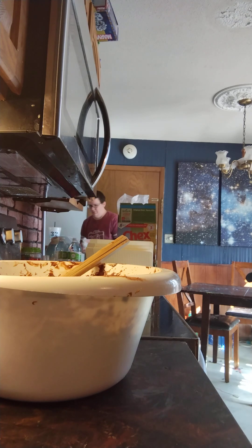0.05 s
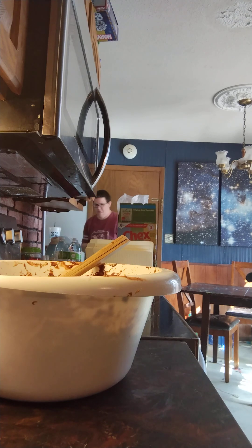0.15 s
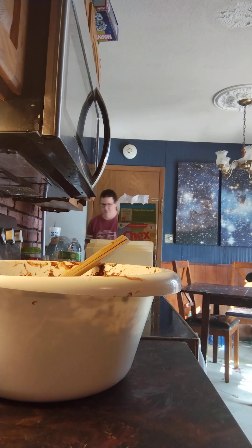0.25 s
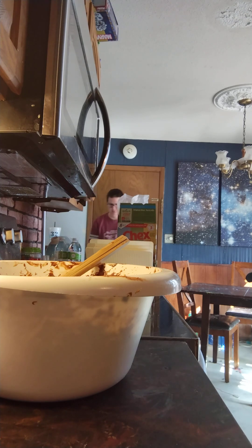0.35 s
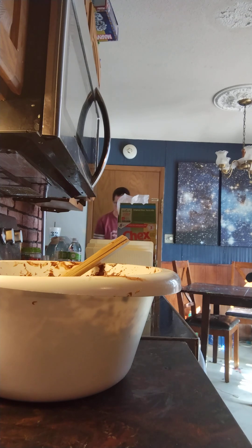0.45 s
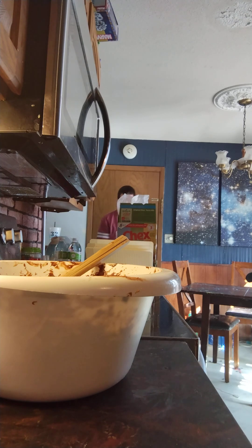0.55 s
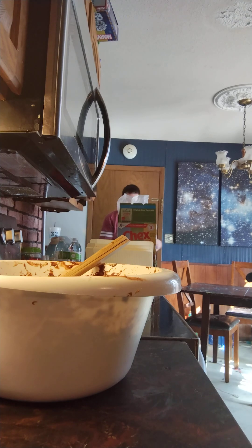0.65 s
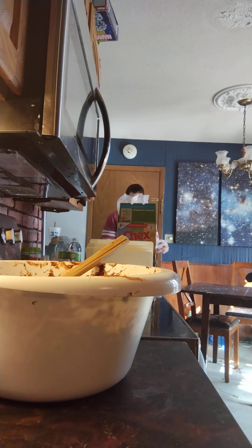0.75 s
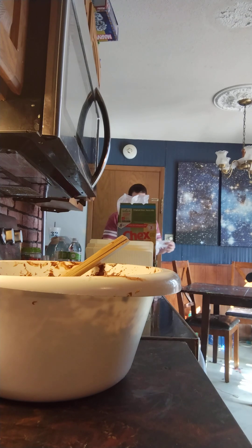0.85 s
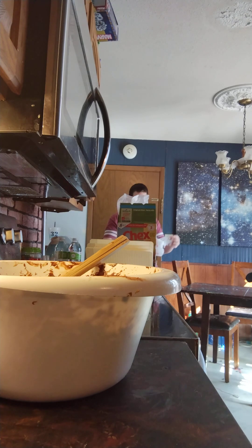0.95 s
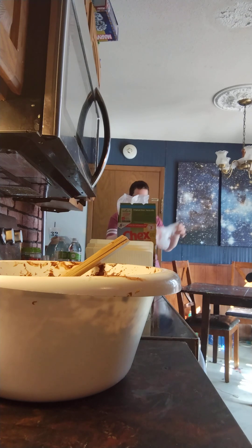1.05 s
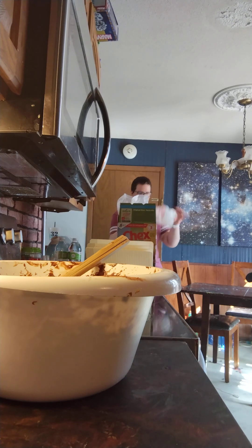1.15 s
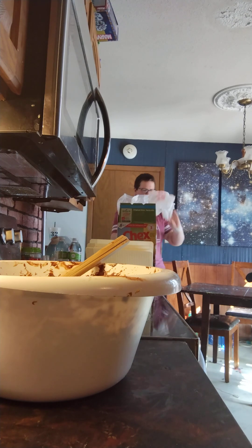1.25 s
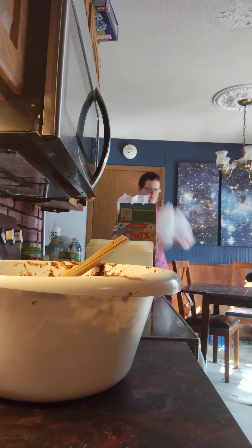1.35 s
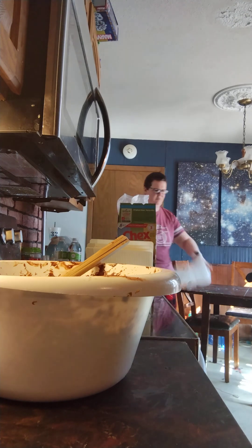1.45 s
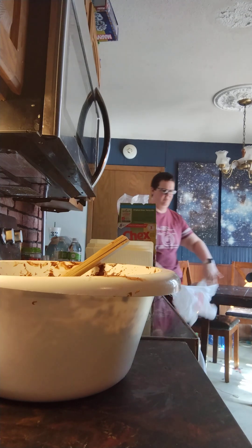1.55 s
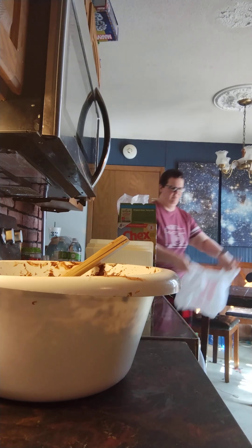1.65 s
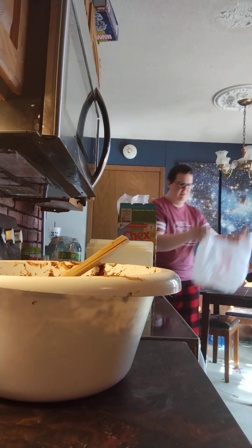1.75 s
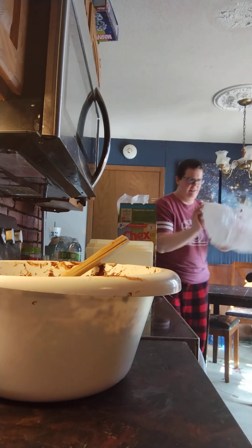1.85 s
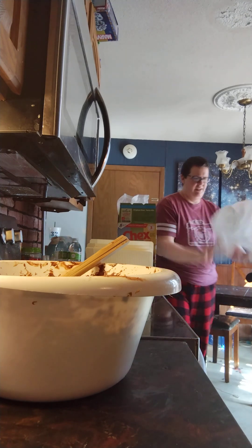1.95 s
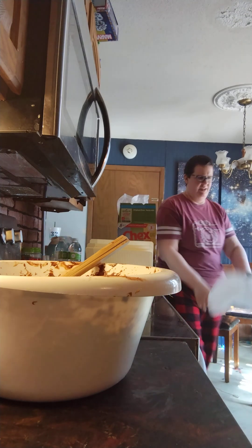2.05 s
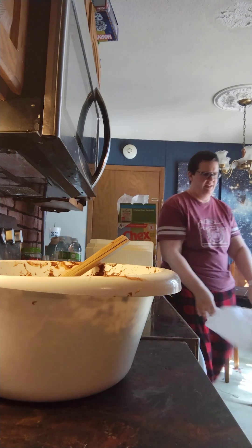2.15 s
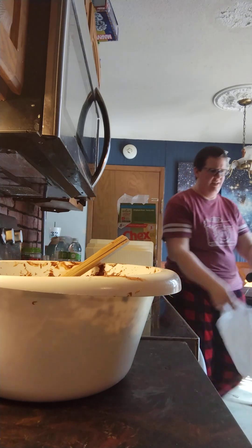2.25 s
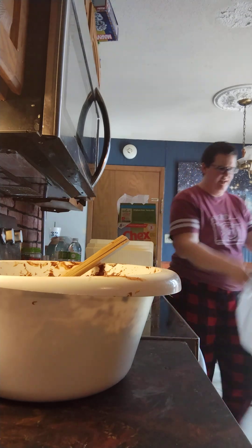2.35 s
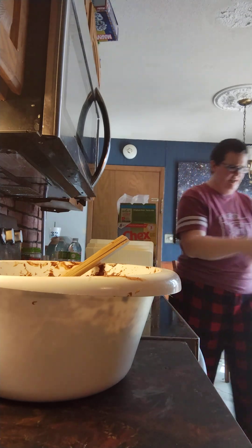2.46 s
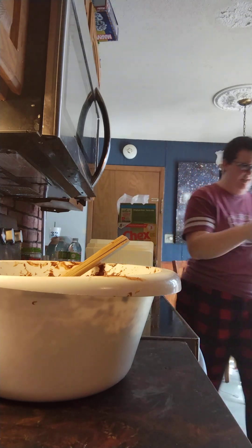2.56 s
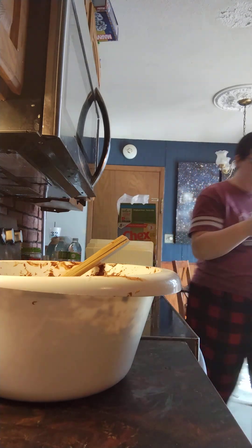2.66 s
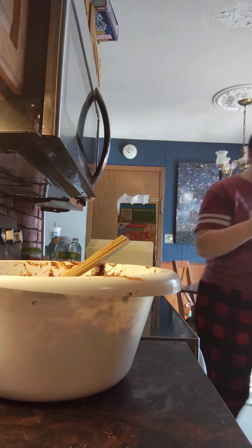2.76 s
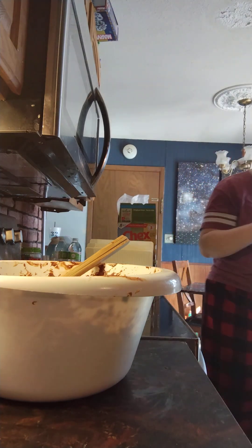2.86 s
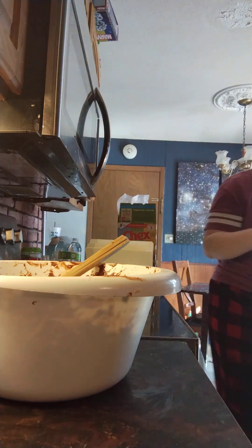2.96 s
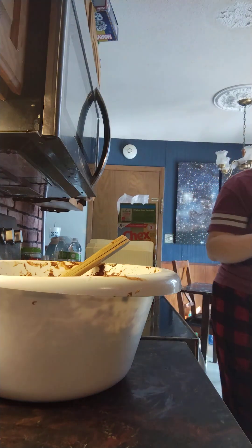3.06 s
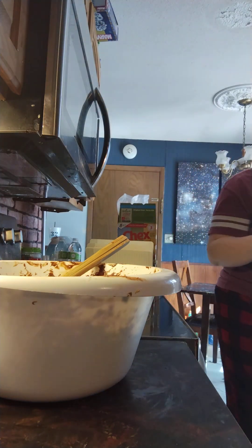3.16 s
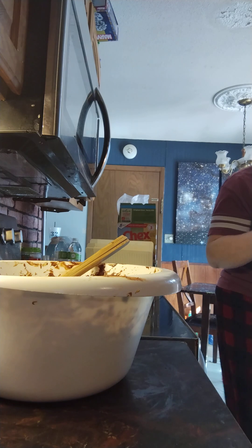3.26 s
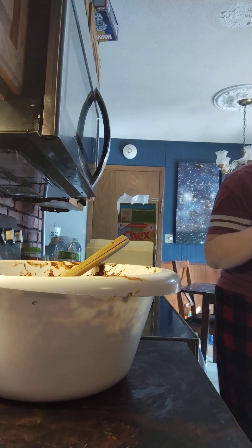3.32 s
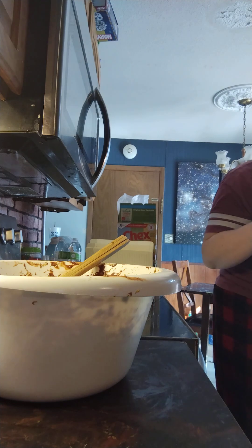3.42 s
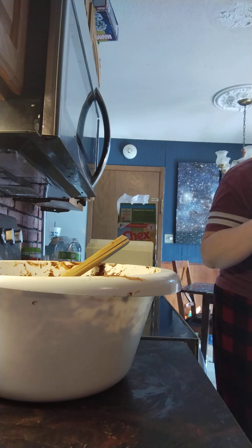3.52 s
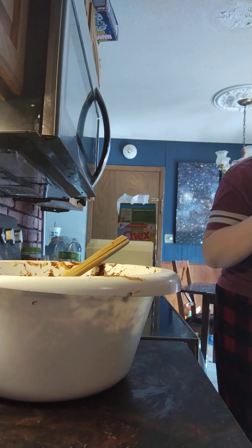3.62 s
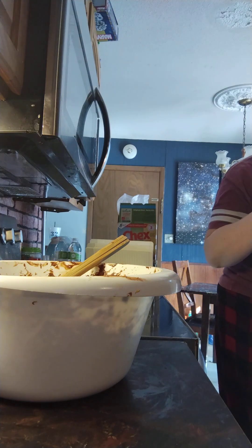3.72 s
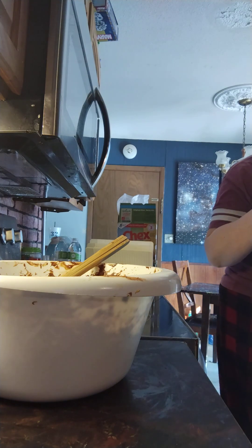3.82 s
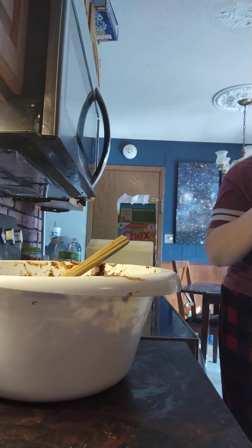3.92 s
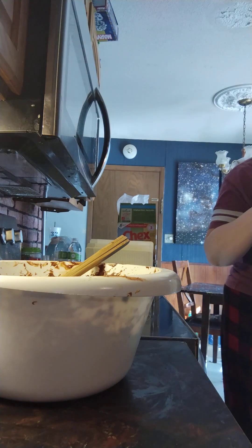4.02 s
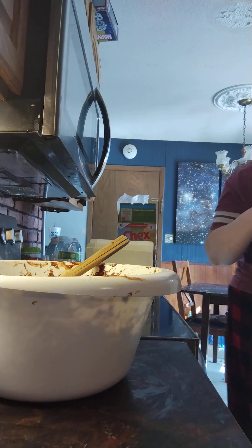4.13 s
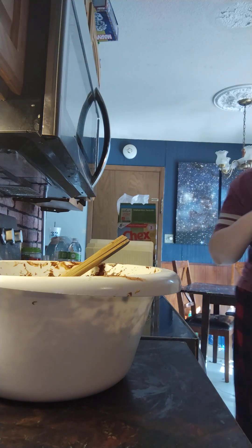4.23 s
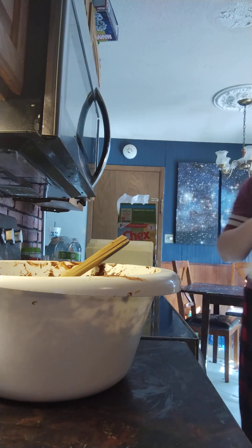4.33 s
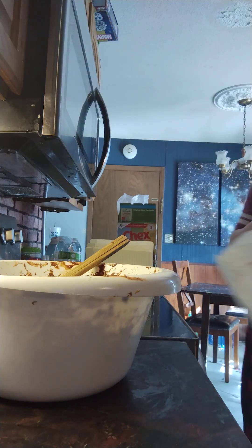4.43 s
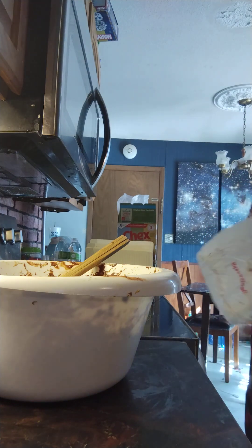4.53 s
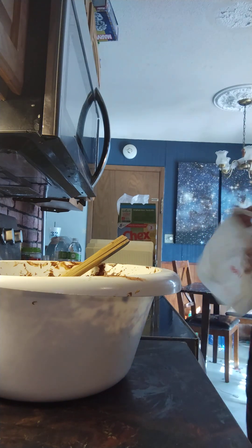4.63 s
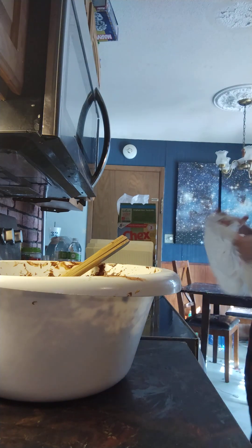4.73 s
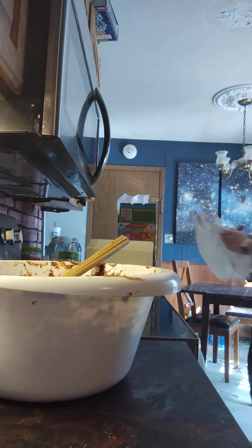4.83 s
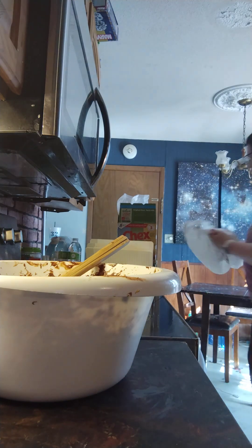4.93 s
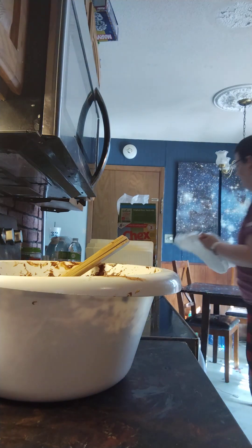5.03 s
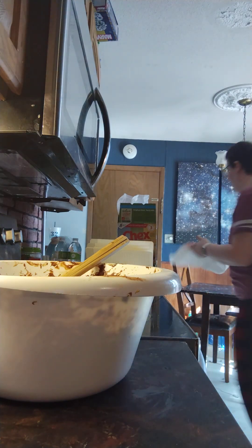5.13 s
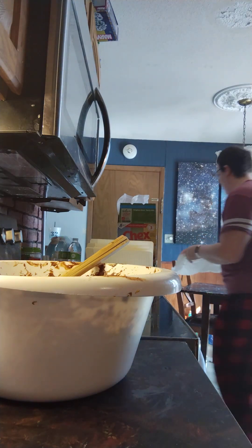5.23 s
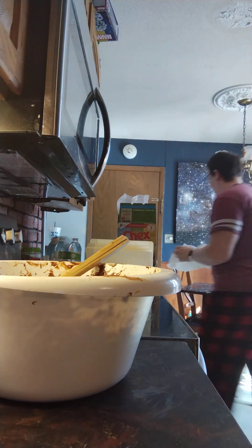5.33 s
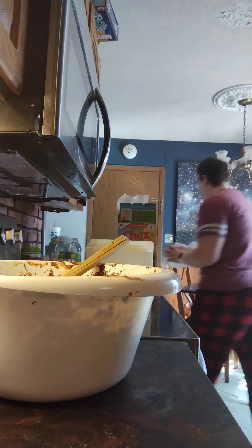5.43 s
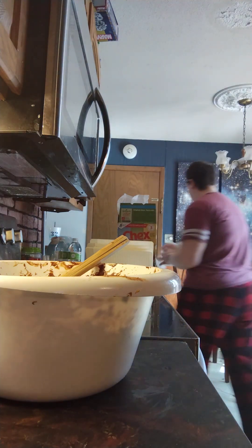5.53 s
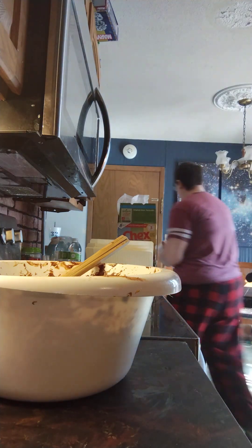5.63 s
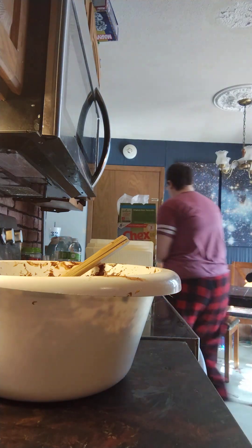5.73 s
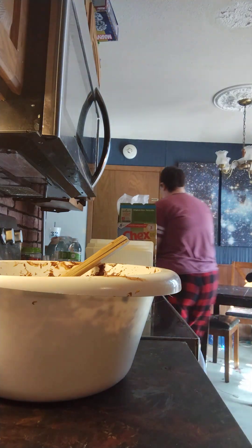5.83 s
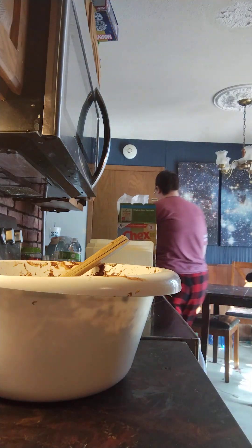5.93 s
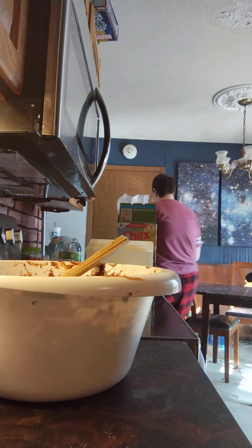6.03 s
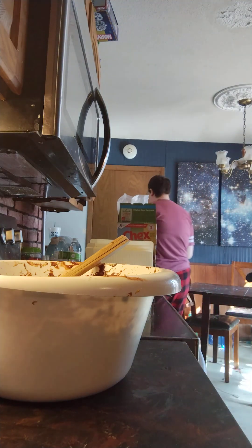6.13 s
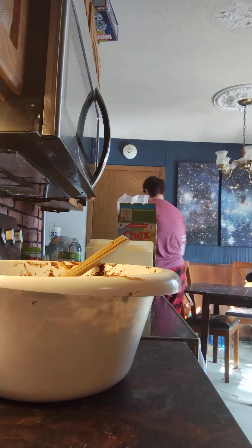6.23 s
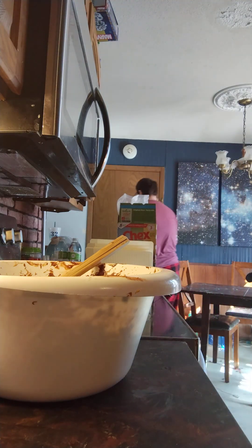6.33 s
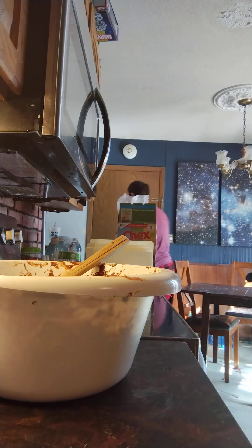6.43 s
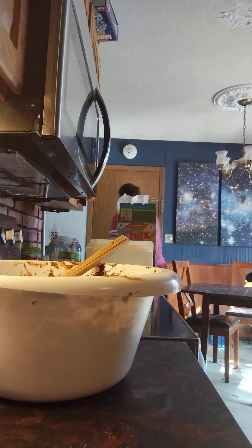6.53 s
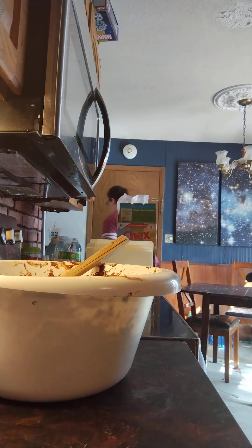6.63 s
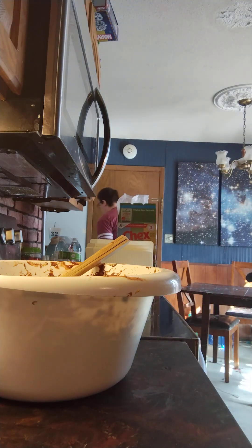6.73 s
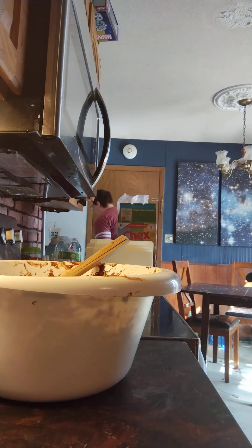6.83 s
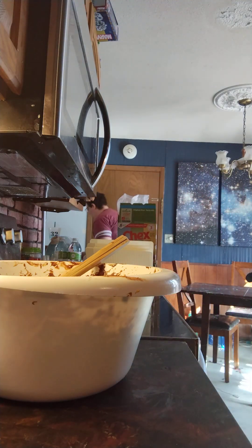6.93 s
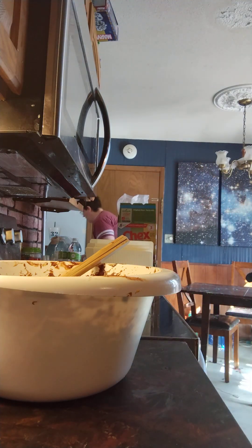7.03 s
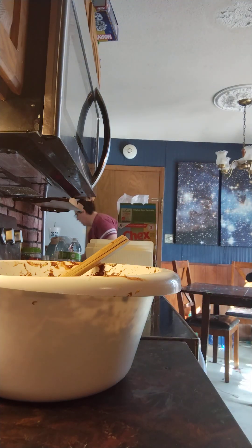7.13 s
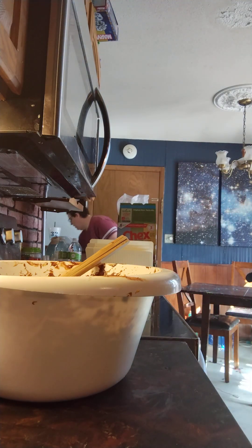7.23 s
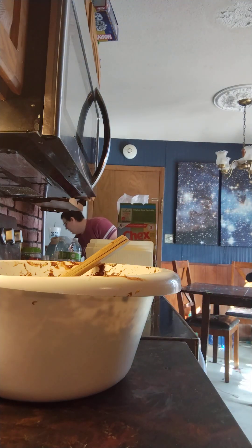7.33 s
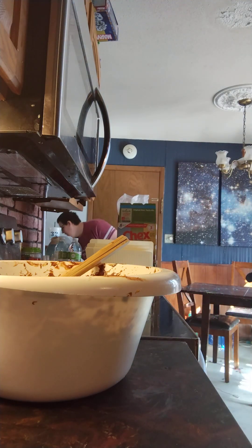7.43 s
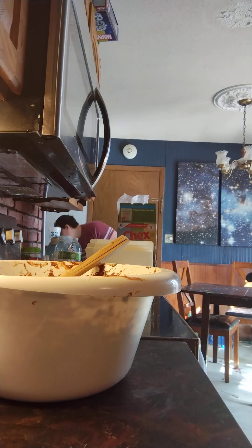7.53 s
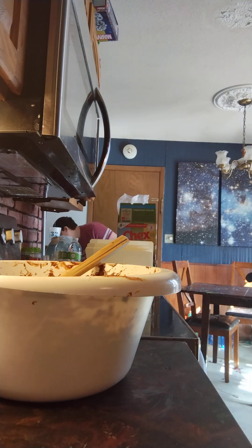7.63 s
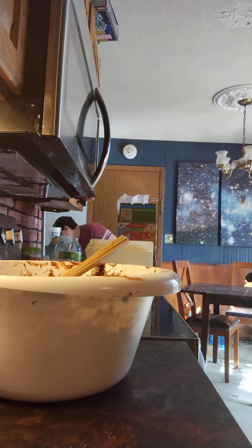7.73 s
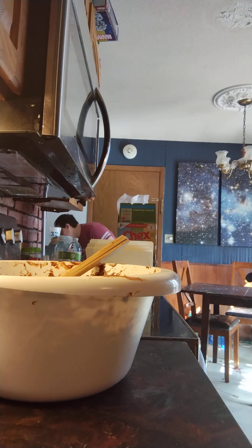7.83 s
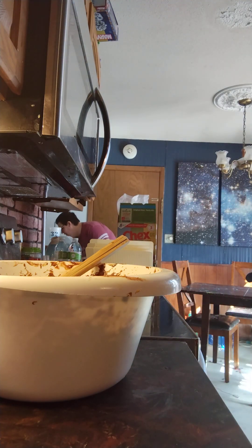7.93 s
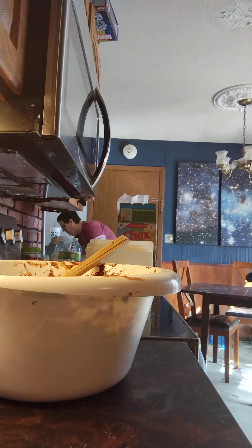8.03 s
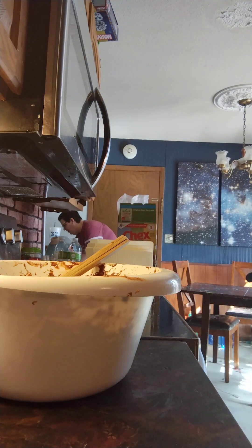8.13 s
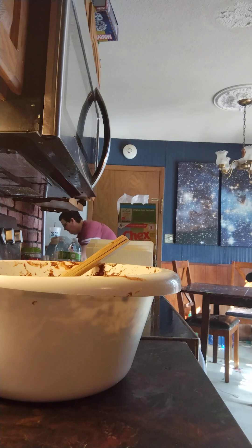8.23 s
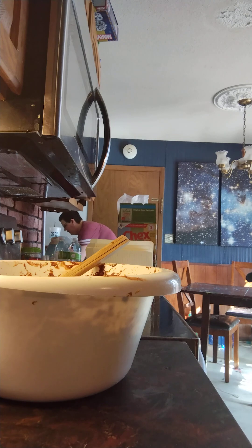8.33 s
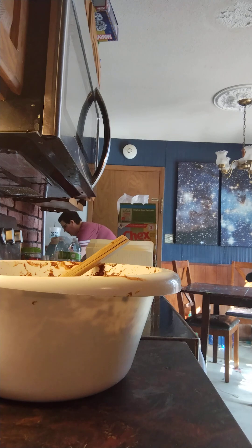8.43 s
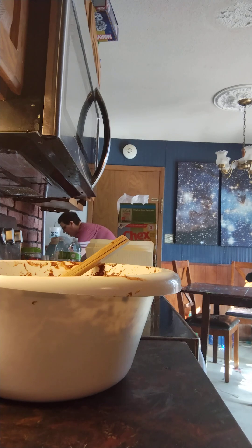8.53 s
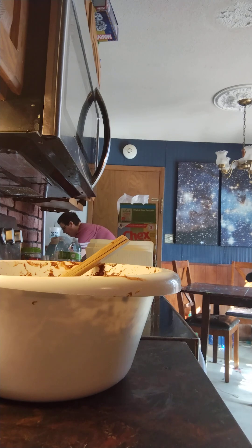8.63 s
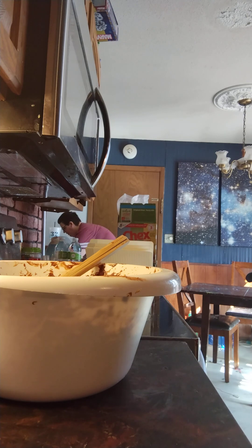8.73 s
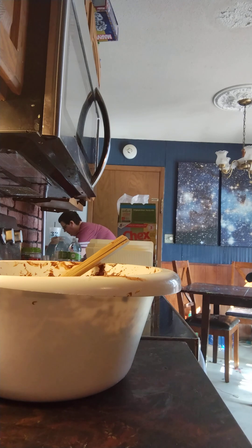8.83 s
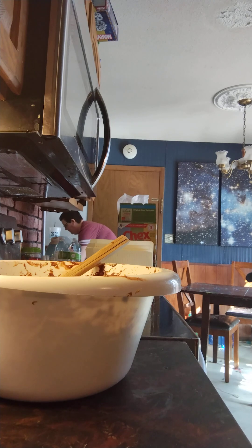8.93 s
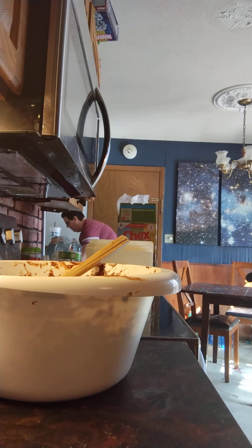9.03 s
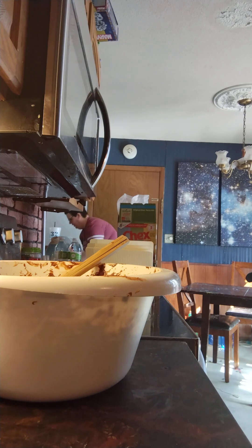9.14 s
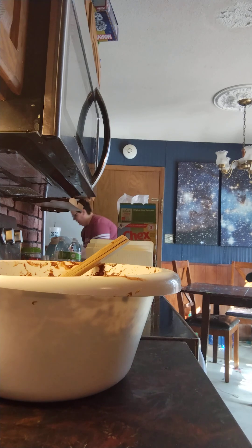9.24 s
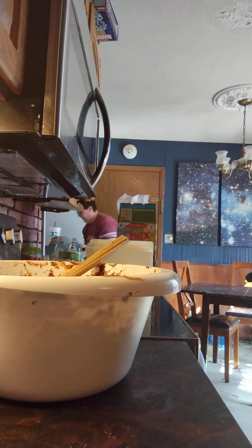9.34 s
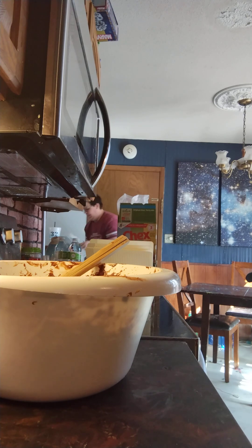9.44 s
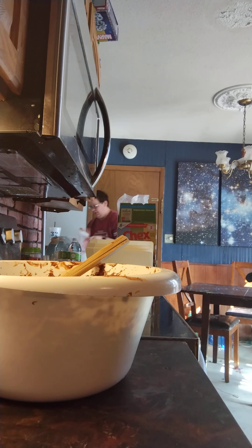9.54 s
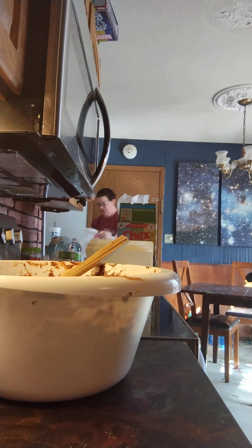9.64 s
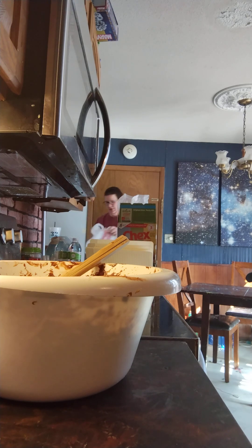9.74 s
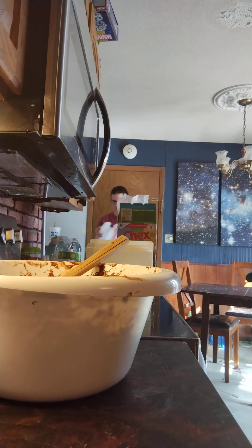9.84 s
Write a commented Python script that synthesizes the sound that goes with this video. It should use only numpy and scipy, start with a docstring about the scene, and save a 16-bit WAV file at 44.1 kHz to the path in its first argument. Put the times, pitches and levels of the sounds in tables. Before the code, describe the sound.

In a quiet, lightly echoing kitchen, a thin plastic bag rustles at the far end, builds, and is shaken with a small crack, then one loud snap at about two seconds. Soft footsteps and dull bumps approach. The bag crackles brightly near the counter microphone, moves away, a cupboard door knocks and rattles, and faint rummaging continues at a distance.

```python
"""Kitchen, heard by a two-port microphone on a counter under wall cupboards.
A thin plastic bag is carried through, shaken open with one loud snap and rummaged with at the far end.
Film: random clicks, filtered in bands and spread over changing room echoes. Snaps: bursts of denser clicks.
Footfalls and bumps: shaped noise. A light tap and a wooden knock: ringing modes over a noise boom.
Still air: steady coloured noise."""
import sys
import numpy as np
from scipy import signal
from scipy.fft import rfft, irfft, next_fast_len
from scipy.io import wavfile

SR = 44100
rng = np.random.default_rng(int(sys.argv[2]) if len(sys.argv) > 2 else 0)


def unload_audio(sound):
    """Save the sound as a 16-bit wav file, at the path given as the first command line argument."""
    columns = np.transpose(np.atleast_2d(sound))
    # keep every value between -1 and 1, then stretch to whole-number steps
    steps = np.round(np.clip(columns, -1, 1) * 32767)
    wavfile.write(sys.argv[1], SR, steps.astype(np.int16))


N = 435266
TIME_S = np.arange(N) / SR
BAND_EDGES_HZ = np.geomspace(90, 17000, 16)
BAND_CENTRES_HZ = np.sqrt(BAND_EDGES_HZ[1:] * BAND_EDGES_HZ[:-1])

# Still air of the house, relative spectrum: frequency_hz [Hz], density_db [dB per Hz]
AIR_SPECTRUM = [(25, -21), (45, -3), (70, -1.5), (150, 6.5), (280, -3), (600, -8.5), (1500, -7), (4000, -8),
                (9000, -17.5), (16000, -21.5)]
AIR_LEVEL_DB = -65.5   # ahead of the nook

# Resonances (+) and hollows (-) above the counter: centre_hz [Hz], width_hz [Hz, before scaling by gain], gain_db [dB]
NOOK_BANDS = [(213, 97, -4), (460, 210, 4.5), (556.5, 89, -10.5), (678, 88, 2.5), (1114, 213, 3.5),
              (1340, 77, -2), (1548, 187, 4)]
# Likeness of the two ports: frequency_hz [Hz], correlation [-1 to 1]
PORT_CORRELATION = [(40, .85), (110, .9), (300, .96), (470, .94), (560, .68), (660, .72), (900, -.2),
                    (1030, .45), (1290, -.62), (1560, .08), (1830, -.2), (2220, .3), (2600, .05),
                    (15000, 0)]
# Port balance: frequency_hz [Hz], left_minus_right_db [dB]
PORT_BALANCE = [(60, -3), (160, -2), (450, 1), (800, 5), (1150, 2), (1340, 7), (1570, 5), (2100, 2),
                (3300, -1.1), (6000, -2), (8500, -2.5), (14000, 3)]
# Kitchen reverberation: frequency_hz [Hz], t60_s [s]
ROOM_DECAY = [(100, 0.57), (500, 0.22), (2000, 0.43), (6000, 0.4), (16000, 0.17)]

# Footfalls: peak_s [s], level_db [dB]
FOOTFALLS = [(1.07, -71), (1.67, -63), (1.83, -66), (2.205, -56), (2.35, -64), (2.7, -61), (2.8, -63),
             (3.3, -63), (4.36, -66), (5.06, -63), (5.65, -61), (6.2, -62), (6.725, -63), (7.27, -78)]
# Footfall relative spectrum: frequency_hz [Hz], density_db [dB per Hz]
FOOTFALL_SPECTRUM = [(25, -4), (45, -10), (65, 16.5), (100, -5), (160, -14), (300, -18), (800, -52.5)]
FOOTFALL_RISE_S, FOOTFALL_FALL_S = .012, 0.1   # time constants
# Dull bumps and scuffs of hands, clothes, furniture: peak_s [s], level_db [dB], rise_s [s], fall_s [s]
BODY_BUMPS = [(1.15, -51.5, 0.0082, 0.034), (1.225, -51, 0.012, 0.061), (2.271, -41, 0.0042, 0.055),
              (2.707, -48.5, 0.0064, 0.045), (2.78, -55, 0.016, 0.047), (3.294, -56, 0.0047, 0.069),
              (4.145, -51.5, 0.0057, 0.018), (4.36, -53, 0.0034, 0.083), (5.11, -56, 0.0089, 0.015),
              (5.175, -38.5, 0.023, 0.026), (6.24, -47.5, 0.015, 0.031), (6.72, -54, 0.0055, 0.035)]
# Bump relative spectrum: frequency_hz [Hz], density_db [dB per Hz]
BUMP_SPECTRUM = [(60, -10.5), (140, -2), (250, -1), (370, 3), (550, -39), (1100, -37), (3000, -24),
                 (10000, -40)]

# Wood contacts, a light tap, then a cupboard door knocking and rattling shut: start_s [s], strength_db [dB]
WOOD_CONTACTS = [(4.127, -17), (6.857, -8), (6.863, 4), (6.872, 0), (6.885, -7), (6.907, -10), (6.934, -12),
                 (6.957, -11.5), (6.974, -25)]
# Modes of the door panel: frequency_hz [Hz], level_db [dB], t60_s [s]
DOOR_MODES = [(250, -36, 0.041), (317, -31, 0.048), (377, -37, .045), (500, -36, 0.057), (745, -33, 0.03),
              (1000, -32, .018), (1160, -31, 0.025), (1700, -37.5, 0.0085), (2400, -35.5, 0.0061),
              (3550, -48, .0074)]
# Boom of the cupboard behind the door, relative spectrum: frequency_hz [Hz], density_db [dB per Hz]
CARCASS_SPECTRUM = [(70, -28), (150, -3.5), (240, 2), (350, 0.5), (520, -10), (1200, -4), (1700, -15),
                    (4000, -25), (10000, -54)]

# Film pulled taut: peak_s [s], level_db [dB], rise_s [s], fall_s [s]
TAUT_SNAPS = [(1.555, -24.5, .006, .016), (2.152, -9.5, 0.012, 0.011), (4.128, -57.5, .0011, 0.024),
              (4.478, -40, 0.014, .018), (5.075, -43, .005, 0.0086), (5.283, -36, .0067, .0079)]
# Snap relative spectrum: frequency_hz [Hz], density_db [dB per Hz]
SNAP_SPECTRUM = [(50, -5.5), (150, -12), (330, -0.5), (700, -3.5), (1600, 1), (2600, -1), (5000, -2),
                 (8000, -4), (15000, -12.5)]
# Buckling film, relative spectrum: frequency_hz [Hz], density_db [dB per Hz]
FILM_SPECTRUM = [(60, -1.5), (130, -1), (220, -25.5), (400, -5), (800, -2), (1200, -1), (2200, 1.5),
                 (3300, -1), (5000, -3.5), (7500, -4.5), (10000, -9.5), (13000, -16), (16000, -12)]
# Hand moves (lift, shake, gather, rummage):
# full_strength_s [s], hold_s [s], crinkle_db [dB, relative], build_up_s [s, time constant]
HAND_MOVES = [(.03, .12, -52.5, 0.059), (.54, .18, -40.5, .13), (.78, 0.11, -46.5, .02),
              (1.137, .1, -49, .036), (1.459, .14, -36.5, 0.066), (1.699, .14, -37, .04),
              (2.124, 0.091, -30, 0.08), (2.431, .01, -33.5, .11), (2.74, .06, -44.5, 0.044),
              (2.927, .02, -45.5, .09), (3.28, 0.034, -46.5, .25), (3.462, .17, -56, 0.011),
              (3.697, .17, -63, .08), (4.144, 0.071, -64, .02), (4.477, 0.022, -38.5, 0.091),
              (4.61, 0.21, -35.5, .066), (4.879, .13, -39, .056), (5.053, .23, -36.3, .03),
              (5.427, .22, -40, .056), (5.744, .34, -39, .08), (6.163, 0.093, -43.5, 0.037),
              (6.57, .03, -42.5, 0.36), (6.68, 0.086, -43, .027), (6.89, .03, -53, .04),
              (7.13, .19, -69.5, .29), (7.676, .13, -55.5, .063), (8.07, .2, -49.5, 0.15),
              (8.46, .27, -42.5, .22), (8.831, .07, -45, .04), (8.97, .13, -50.5, .07),
              (9.39, .08, -48.5, .16), (9.7, .14, -43.5, .11)]
SETTLE_S = .08   # time constant of the film coming to rest after a move
# Crinkle tone as the bag is carried to the counter and away, re the middle, before fixed band offsets:
# time_s [s], bass_db [dB], treble_db [dB], top_db [dB]
CARRY_TONE = [(0, -17.5, 0, -10), (.42, -14.5, 0, -8), (.63, -12.5, -1, -2), (1.2, -9.5, -1.5, -3),
              (1.55, -9.5, 0, -2), (2.7, -6, -1.5, -2), (3.1, -13, -1, -1.5), (4.14, -11, 0.5, -6.5),
              (4.28, -9, 6.5, 4), (4.65, -13.5, 1.5, -0.5), (4.919, -10, -3.5, -3), (5.2, -5, -1.5, -4.5),
              (5.45, -9.5, -3, -4.5), (6.07, -9.5, -3, -7), (6.38, -14, -9, -12.5), (7.7, -8, 0, -11),
              (8.5, -11.5, -6.5, -10.5), (9.86, -14, -1.5, -5)]
# Walker turned away, body shadowing the bag: time_s [s], hollow_depth [0-1]
BODY_SHADOW = [(5.32, .03), (5.39, 0.4), (5.75, 0.37), (6.2, 0.2)]
# Bag held open near the counter
OPEN_AT_S, OPEN_RISE_S, OPEN_HOLD_S, OPEN_FALL_S = 4.52, 0.14, 0.16, 0.14
CAVITY_HZ, CAVITY_WIDTH_HZ, CAVITY_LIFT = 1550, 190, 0.91

CUTOFF_HZ = 15800


def from_db(db):
    """Decibels to amplitude gain."""
    return 10 ** (np.asarray(db) / 20)


def rms_one(x):
    """Scale to unit power."""
    return x / np.sqrt(np.mean(x ** 2) + 1e-20)


def in_time(rows):
    """Interpolate each column of a time table to every sample."""
    at_s, *columns = np.transpose(rows)
    return [np.interp(TIME_S, at_s, column) for column in columns]


def at_hz(points, hz):
    """Read a table on a log-frequency axis."""
    point_hz, value = np.transpose(points)
    return np.interp(np.log(hz + 1e-9), np.log(point_hz), value)


def drift(rate_hz):
    """Random curve of unit power through rate_hz knots a second."""
    knots = rng.standard_normal(4000)
    return rms_one(np.interp(TIME_S * rate_hz, np.arange(len(knots)), knots))


def band(x, k):
    """Half-octave band k."""
    sos = signal.butter(2, BAND_EDGES_HZ[k:k + 2], "band", fs=SR, output="sos")
    return signal.sosfilt(sos, x + 1e-18)


def coloured(x, spectrum):
    """White signal given a smooth spectrum, at unit power."""
    size = next_fast_len(N)
    hz = np.arange(size // 2 + 1) * SR / size
    gain = from_db(at_hz(spectrum, hz))
    return rms_one(irfft(rfft(x, size) * gain, size)[..., :N])


def swell(peak_s, level_db, rise_s, fall_s, hold_s=0, t=TIME_S):
    """Envelope: exponential growth to peak_s, hold, exponential decay."""
    before = (peak_s - t) / rise_s
    after = (t - peak_s - hold_s) / fall_s
    return from_db(level_db) * np.exp(-np.clip(np.maximum(before, after), 0, 20))


def diffuse(size):
    """White sound from all sides at two ports: alike in the bass, mostly unrelated in the upper treble."""
    hz = np.arange(size // 2 + 1) * SR / size
    mid, side = rfft(rng.standard_normal((2, size)))
    alike = np.clip(at_hz(PORT_CORRELATION, hz), -1, 1)
    signs = np.array([[1], [-1]])   # left, right
    pair = np.sqrt((1 + alike) / 2) * mid + np.sqrt((1 - alike) / 2) * side * signs
    return irfft(pair * from_db(signs * at_hz(PORT_BALANCE, hz) / 2), size)


def still_air():
    """Steady diffuse noise of the house."""
    return from_db(AIR_LEVEL_DB) * coloured(diffuse(N), AIR_SPECTRUM)


def nook(x):
    """The gap between counter and cupboards lifts some bands and hollows out others."""
    for centre_hz, width_hz, gain_db in NOOK_BANDS:
        q = centre_hz / (width_hz * from_db(-gain_db / 2))
        b, a = signal.iirpeak(centre_hz, q, fs=SR)
        x = x + (from_db(gain_db) - 1) * signal.lfilter(b, a, x)
    return x


def echoes(direct_db, early_db, early_s):
    """Weak direct path, early cluster off counter and cupboards, tail with a decay set per band."""
    size = 20000
    t = np.arange(size) / SR
    hz = np.arange(size // 2 + 1) * SR / size
    field = rfft(diffuse(size))
    response = np.zeros((2, size))
    edges_hz = [0, 400, 1500, 4000, 7000, 11000, SR]
    for low, high in zip(edges_hz, edges_hz[1:]):
        tail = from_db(-60 * t / at_hz(ROOM_DECAY, (low + high) / 2))
        shape = rms_one(tail + from_db(early_db) * np.exp(-t / early_s))
        in_band = (hz >= low) * (hz < high)
        response += irfft(field * in_band, size) * shape / np.sqrt(size)
    response[[0, 1], [20, 0]] += from_db(direct_db)   # direct path: left 20 samples after right
    return response / np.hypot(1, from_db(direct_db))


def kitchen(x, direct_db, early_db, early_s=0.021):
    """Sound from one spot convolved with its echoes at the two ports."""
    return signal.oaconvolve(x[None], echoes(direct_db, early_db, early_s), axes=1)[:, :N]


def walker():
    """Soft soles shake the floor; hands and clothes bump and scuff: noise under envelopes."""
    step_level = sum(swell(s, db, FOOTFALL_RISE_S, FOOTFALL_FALL_S) for s, db in FOOTFALLS)
    steps = coloured(rng.standard_normal(N), FOOTFALL_SPECTRUM) * step_level
    bump_level = sum(swell(*row) for row in BODY_BUMPS)
    bumps = coloured(rng.standard_normal(N), BUMP_SPECTRUM) * bump_level
    return steps + bumps


def door(boom_db=-36, boom_rise_s=0.0026, boom_fall_s=0.0096):
    """Each contact rings every panel mode at its own random strength, over the cupboard's dull boom."""
    start_s, strength_db = np.transpose(WOOD_CONTACTS)
    boom_level = sum(swell(s, db + boom_db, boom_rise_s, boom_fall_s) for s, db in WOOD_CONTACTS)
    out = coloured(rng.standard_normal(N), CARCASS_SPECTRUM) * boom_level
    for k, (hz, level_db, t60_s) in enumerate(DOOR_MODES):
        hits = np.full(N, 1e-18)
        spread_db = rng.normal(0, 1.9, len(start_s))
        hits[(start_s * SR).astype(int)] = from_db(strength_db + level_db + spread_db)
        radius = from_db(-60 / (t60_s * SR))
        angle = 2 * np.pi * hz / SR
        poles = [1, -2 * radius * np.cos(angle), radius * radius]
        out += (-1) ** k * signal.lfilter([.5, 0, -.5], poles, hits)
    return out


def buckles(per_s, spread_db):
    """Random clicks, many small and few large, of even mean power at any rate."""
    chance = np.minimum(per_s / SR, 1)
    sizes = from_db(spread_db * np.minimum(rng.exponential(1, N), 5)) * rng.choice([-1, 1], N)
    return rms_one(sizes * (rng.random(N) < chance) / np.sqrt(chance))


def snaps():
    """Air fills the bag and a whole sheet of creases cracks at once."""
    level = sum(swell(*row) for row in TAUT_SNAPS)
    return coloured(buckles(9000, spread_db=6.5), SNAP_SPECTRUM) * level


def effort():
    """Handling strength in dB: moves build up, hold and settle; overlaps add in power."""
    t = TIME_S[::40]
    power = sum(swell(s, db, rise_s, SETTLE_S, hold_s, t) ** 2 for s, hold_s, db, rise_s in HAND_MOVES)
    return np.interp(TIME_S, t, 10 * np.log10(power))


def crinkle(per_s=6000, spread_db=3.5, clump_db=1.0, patchy_db=0.7, level_db=1.5,
            band_offsets_db=(10, 2.5, 5.5)):
    """Creases give way in clumps; harder handling sets off more of them."""
    effort_db = effort()
    bass_db, treble_db, top_db = in_time(np.array(CARRY_TONE) + [0, *band_offsets_db])
    rate_per_s = per_s * from_db(.45 * (effort_db + 42))   # per_s holds at -42 dB effort
    clicks = buckles(rate_per_s, spread_db) * from_db(effort_db + level_db + clump_db * drift(110))
    flipped = clicks * rng.choice([-1, 1], N)   # neighbouring bands ring with unrelated signs
    film_power = from_db(at_hz(FILM_SPECTRUM, BAND_CENTRES_HZ)) ** 2 * np.diff(BAND_EDGES_HZ)
    norm = np.sqrt(np.sum(film_power) / (SR / 2))
    out = np.zeros(N)
    for k, hz in enumerate(BAND_CENTRES_HZ):
        bass_share = at_hz([(600, 1), (1100, 0.097)], hz)
        treble_share = at_hz([(2400, 0), (3800, 1), (5500, 0.93), (9000, 0.062)], hz)
        top_share = at_hz([(5500, 0), (9000, 1.1)], hz)
        tone_db = bass_share * bass_db + treble_share * treble_db + top_share * top_db
        gain_db = at_hz(FILM_SPECTRUM, hz) + tone_db + patchy_db * drift(35)
        out += band(flipped if k % 2 else clicks, k) * from_db(gain_db)
    return out / norm


def cavity(x):
    """While the bag is held open, its hollow lifts one band of the crinkle."""
    opening = swell(OPEN_AT_S, 0, OPEN_RISE_S, OPEN_FALL_S, OPEN_HOLD_S)
    b, a = signal.iirpeak(CAVITY_HZ, CAVITY_HZ / CAVITY_WIDTH_HZ, fs=SR)
    return x + CAVITY_LIFT * opening * signal.lfilter(b, a, x)


def shadowed(x, hollow_hz=5300, width_hz=1200):
    """Sound bending round the body partly cancels in one treble band."""
    depth, = in_time(BODY_SHADOW)
    b, a = signal.iirpeak(hollow_hz, hollow_hz / width_hz, fs=SR)
    return x - depth * signal.lfilter(b, a, x)


def bag(lowest_hz=110, count=10):
    """Creases face all ways and wake different echoes by the moment; the bag's sound is cut below lowest_hz."""
    film = shadowed(cavity(crinkle())) + snaps()
    out = 0
    moments_s = np.arange(0, TIME_S[-1], .002)
    facing = np.cumsum(rng.integers(1, count, len(moments_s))) % count   # new direction each moment
    for way in range(count):
        share = np.sin(np.pi / 2 * np.interp(TIME_S, moments_s, facing == way))   # equal-power crossfade
        out = out + kitchen(film * share, direct_db=-12.5, early_db=0.0)
    return signal.sosfilt(signal.butter(2, lowest_hz, "high", fs=SR, output="sos"), out)


def scene():
    """Air, walker, door and bag summed, then coloured by the nook."""
    body = kitchen(walker(), direct_db=-3, early_db=17.5)
    knock = kitchen(door(), direct_db=-8, early_db=17)
    return nook(still_air() + body + knock + bag())


def record(dry):
    """Steep elliptic low-pass at CUTOFF_HZ."""
    return signal.sosfilt(signal.ellip(12, .1, 80, CUTOFF_HZ, fs=SR, output="sos"), dry)


dry = scene()
out = record(dry)
unload_audio(out)
```